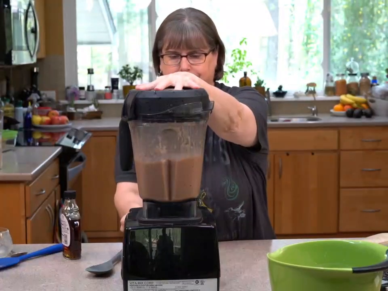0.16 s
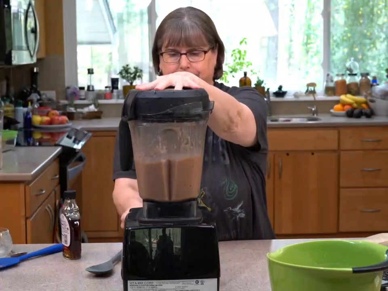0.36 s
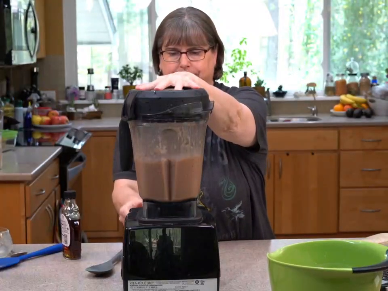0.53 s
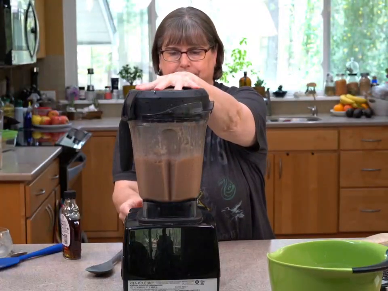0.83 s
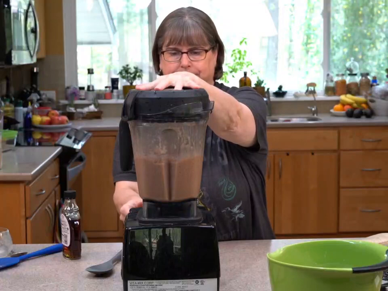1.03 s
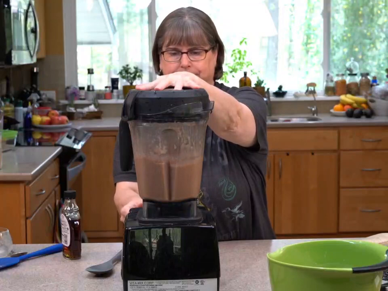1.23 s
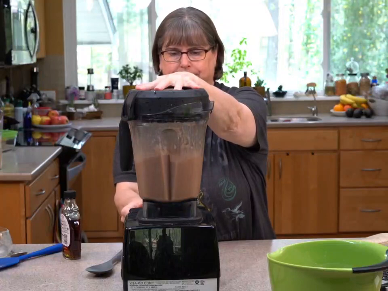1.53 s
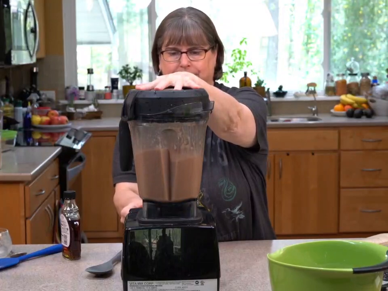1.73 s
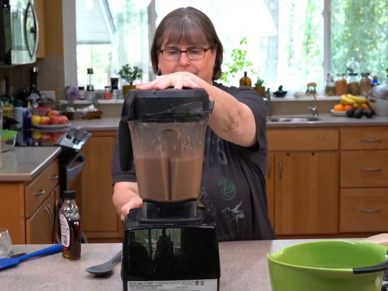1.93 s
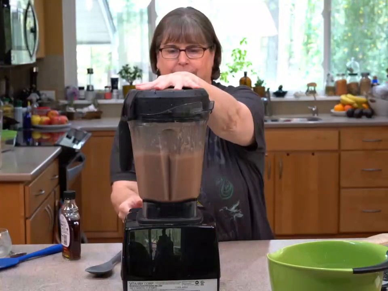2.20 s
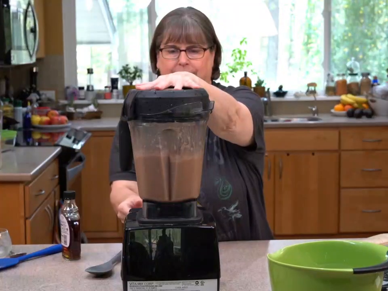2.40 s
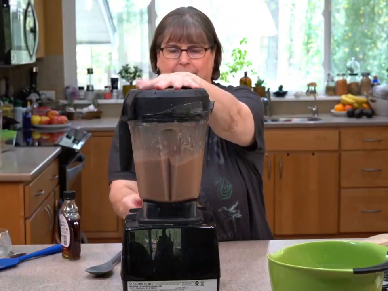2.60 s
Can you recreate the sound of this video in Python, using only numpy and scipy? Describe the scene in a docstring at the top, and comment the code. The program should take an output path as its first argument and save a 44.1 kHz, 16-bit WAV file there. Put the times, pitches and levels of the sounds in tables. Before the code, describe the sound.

A kitchen blender clicks on, buzzes low, then roars loudly, crunching ice in a thick drink

```python
"""A quiet kitchen, the microphone close to a blender: noise for the hush, a wavering sine for a faint far whistle.
A hand bumps the base and clicks the switch; the motor buzzes at low speed as harmonics of its magnetic pull.
Then the dial is turned up and the blades churn a thick drink: coloured noise, jug-wall rings and gritty cracks,
with lumps knocking the jug and ice cracking as short noise bursts sent through resonances."""
import sys
import numpy as np
from scipy import signal
from scipy.fft import rfft, irfft, next_fast_len
from scipy.io import wavfile
from scipy.ndimage import uniform_filter1d, map_coordinates

SR = 44100
rng = np.random.default_rng(int(sys.argv[2]) if len(sys.argv) > 2 else 0)


def file_out(sig):
    """Save sig as 16-bit WAV at sys.argv[1]."""
    # one column per channel
    cols = np.atleast_2d(sig).T
    # limit, then scale
    lim = np.clip(cols, -1, 1)
    pcm = np.round(lim * 32767).astype(np.int16)
    wavfile.write(sys.argv[1], SR, pcm)


def decibels_to_gain(level_db):
    """Convert a level in decibels to a linear amplitude gain (20 dB per decade)."""
    exponent = np.asarray(level_db, float) / 20
    return 10 ** exponent


N = 121275  # length in samples
ON_S, LOADED_S = 0.343, 1.21  # motor starts; buzz has given way to the loaded motor


def unit(x):
    """Scale to rms 1."""
    return x / np.sqrt(np.mean(x ** 2) + 1e-20)


def along(points, hz):
    """Read (hz, value) points on a log frequency axis."""
    f, v = np.transpose(points)
    return np.interp(np.log(hz + 1), np.log(f + 1), v)


def curves(rows):
    """One value per sample for each column after the time."""
    s, *cols = np.transpose(rows)
    return [np.interp(np.arange(N) / SR, s, c) for c in cols]


def wobble(rate):
    """A smooth random curve, rate knots a second."""
    knots = rng.standard_normal(int(N * rate / SR) + 4)
    return map_coordinates(knots, [np.arange(N) * rate / SR])


def filtered(x, response):
    """x times a complex response of frequency."""
    m = next_fast_len(N + SR // 2)
    return irfft(rfft(x, m) * response(np.fft.rfftfreq(m, 1 / SR)), m)[..., :N]


def peak(f, hz, wide_hz):
    """A causal resonance on the frequency grid, gain 1 at its centre."""
    return 1j * f * wide_hz / (hz * hz - f * f + 1j * f * wide_hz + 1e-9)


def rush(spectrum, patchy_db):
    """Coloured noise of rms 1 with time-frequency patches of random gain."""
    z = signal.stft(rng.standard_normal(N + 512), nperseg=256)[2]
    field = uniform_filter1d(rng.standard_normal(z.shape), size=4, axis=0)
    field = uniform_filter1d(field, size=4, axis=1)
    x = signal.istft(z * decibels_to_gain(patchy_db * unit(field)), nperseg=256)[1][:N]
    return unit(filtered(x, lambda hz: decibels_to_gain(along(spectrum, hz))))


def placed(s, wave):
    """Add each row of wave into the scene at its start."""
    at = np.round(s * SR).astype(int) + np.arange(wave.shape[1])
    return np.bincount(at.ravel(), wave.ravel(), N + SR)[:N]


def rings(s, db, hz, t60, attack_s):
    """Sum of damped sines, one per row, cut off after 50 ms."""
    t = np.arange(SR // 20) / SR
    s, db, hz, t60 = (np.reshape(v, (-1, 1)) for v in np.broadcast_arrays(s, db, hz, t60))
    envelope = decibels_to_gain(db - 60 * t / np.abs(t60)) * (1 - np.exp(-t / attack_s))
    return placed(s, envelope * np.sin(2 * np.pi * hz * t))


def snaps(s, db, t60, response):
    """Short noise bursts, each through its own response and scaled to its peak."""
    t = np.arange(2048) / SR
    burst = decibels_to_gain(-60 * t / np.abs(np.reshape(t60, (-1, 1)))) * rng.standard_normal((len(s), len(t)))
    wave = irfft(rfft(burst) * response(np.fft.rfftfreq(len(t), 1 / SR)), len(t))
    wave = wave * np.clip(2 - 2 * t / t[-1], 0, 1)  # fade the second half
    wave = wave * (decibels_to_gain(db) / np.abs(wave).max(axis=1))[:, None]
    return placed(s[:, None], wave)


def grains(count, hz, spread, turns, spiky_db):
    """Random short rings, rms 1, some louder than the rest; each loses 60 dB in a set number of turns."""
    u, g, e = rng.random(count), rng.standard_normal(count), rng.exponential(size=count)
    pitch = np.clip(hz * np.exp(spread * g), 100, SR / 3)
    return unit(rings(u * N / SR, spiky_db * np.minimum(e, 3), pitch, turns / pitch, attack_s=.0001))


def kitchen():
    """Room hush as patchy noise, and a faint whistle as a sine of wandering pitch and level."""
    # spectrum of the hush: pitch_hz, relative level_db per Hz
    air = [(15, -20), (45, 5.5), (152, -5), (349, -6), (737, -10), (2200, -18.5), (2730, -19),
           (11800, -25.5)]
    # faint far whistle: time_s, level_db
    whine = [(.09, -71), (.13, -85), (.17, -69), (.26, -69), (.3, -93)]
    db, = curves(whine)
    whistle_hz = 2800 + 110 * wobble(91)
    whistle = decibels_to_gain(db + 2.2 * wobble(48)) * np.sin(2 * np.pi * np.cumsum(whistle_hz) / SR)
    return decibels_to_gain(-58.5) * rush(air, patchy_db=2.0) + whistle


def room(x):
    """Reverberation: noise in which each frequency dies at its own speed, arriving 200 samples late."""
    # decay of the room: pitch_hz, t60_s
    decay = [(200, 0.13), (2000, 0.23), (7000, 0.12)]
    hz, t, z = signal.stft(rng.standard_normal(SR // 2), SR, nperseg=256)
    dying = decibels_to_gain(-60 * t / along(decay, hz)[:, None])
    tail = signal.istft(z * dying, SR, nperseg=256)[1]
    return signal.fftconvolve(np.pad(x, (200, 0)), tail / np.linalg.norm(tail))[:N]


def hand():
    """Plastic clicks of the controls as noise bursts, soft bumps on the base as damped sines."""
    # switch and dial: start_s, peak_db
    click_times = [(0.284, -39), (0.2905, -21), (0.408, -42), (0.4627, -24), (0.88, -37.5), (0.961, -46)]
    # colour of the clicks: pitch_hz, relative level_db
    click_colour = [(2000, -12), (3000, -2.5), (4500, -0.5), (6500, -4.5), (8200, 3), (11000, -15)]
    # hand on the base: start_s, level_db before attack and decay, pitch_hz
    bumps = [(.179, -44, 75), (.305, -36, 360), (.243, -43, 60), (0.316, -40, 830), (.317, -43, 141),
             (0.39, -29.5, 307), (0.456, -23, 340)]
    s, db = np.transpose(click_times)
    clicks = snaps(s, db, np.full(len(s), .013), lambda f: decibels_to_gain(along(click_colour, f)))
    s, db, hz = np.transpose(bumps)
    return clicks + rings(s, db, hz, 0.014 + 5.5 / hz, attack_s=0.00099)  # low bumps last longer


def jug(f):
    """Response of the jug wall: a sum of resonances of alternating sign."""
    # resonances of the wall: pitch_hz, width_hz, relative level_db
    modes = [(289, 30, -9.5), (347, 15, -3.5), (393, 14, -5.5), (574, 68, -9), (705, 105, -26),
             (970, 145, -2.5), (1366, 400, -4.5), (1676, 420, 0), (2130, 110, -1.5)]
    return sum((-1) ** k * decibels_to_gain(db) * peak(f, c, w) for k, (c, w, db) in enumerate(modes))


def knocks():
    """Short scuffs of noise into the jug wall, each lump stressing its own range; brighter ones scrape longer."""
    # heavy lumps hitting the jug: start_s, peak_db, centre_hz
    lump_hits = [(1.148, -22.5, 294), (1.22, -11, 500), (1.261, -17.5, 350), (1.346, -17.5, 300),
                 (1.466, -14.5, 340), (1.554, -13.5, 393), (1.897, -10, 385), (1.912, -9, 1730),
                 (2.008, -9, 1190), (2.078, -14, 870), (2.561, -17.5, 407), (2.601, -11.5, 393)]
    s, db, hz = np.transpose(lump_hits)
    t60 = 0.012 + 0.03 * hz / 1000
    centre = hz[:, None]
    return snaps(s, db, t60, lambda f: jug(f) * peak(f, centre, 1.1 * centre) ** 2)


def crack(s, db, hz, upper_db):
    """A dry snap through a broad blade resonance and a higher one, then a duller after-crunch."""
    def colour(f):
        blade = peak(f, hz[:, None], 1250) ** 2
        return blade - decibels_to_gain(upper_db)[:, None] * peak(f, 9000, 2400) ** 2
    crunch = snaps(s + 0.00062, db - 4, np.full(len(s), .014), lambda f: peak(f, 2330, 1750))
    return snaps(s, db, np.full(len(s), .001), colour) + crunch


def ice():
    """The loud cracks of ice on the blades, each a snap and its crunch."""
    # ice cracking: start_s, snap peak_db, ring_hz, upper ring relative to it_db
    crack_times = [(1.1546, -25, 4750, -5), (1.172, -17.5, 5330, -29), (1.2317, -2.5, 4500, -9),
                   (1.3035, 2, 5200, -32), (1.3217, -17, 5100, -21), (1.3676, -13.5, 4840, -18),
                   (1.388, -15, 4880, 10), (1.4097, -12.5, 5580, -14), (1.473, -17.5, 5600, -21),
                   (1.5202, -16, 5200, -30), (1.5599, -6, 4440, -9.5), (1.5882, -16.5, 4650, -4),
                   (1.6241, -11, 5500, -14), (1.6427, -19, 5100, -12), (1.66, -8.5, 4900, -1),
                   (1.7014, -9.5, 5250, -19), (1.7174, -9, 4600, -11), (1.7613, -14, 5030, -3),
                   (1.8184, -10, 5570, -13), (1.8908, -30, 5140, -19), (1.9074, -12.5, 5300, -19),
                   (1.9904, -10.5, 5550, 11), (2.0843, -9, 5040, -14), (2.2257, -6, 5030, -19),
                   (2.2508, -11, 5040, -17), (2.2766, -25, 5240, -9), (2.3004, -10.5, 4300, -28),
                   (2.3195, -9, 4700, -20), (2.3524, -4, 4900, 4), (2.415, -13.5, 4900, -19),
                   (2.4298, -15.5, 4760, -19), (2.4483, -15, 4840, -36), (2.4785, -6.5, 5100, -5),
                   (2.4862, -7.5, 5230, -25), (2.5302, -15, 5000, -4), (2.6134, -13, 5050, -19),
                   (2.7033, -9.5, 5260, -8)]
    return crack(*np.transpose(crack_times))


def grit(count):
    """Many small cracks at random moments, rms 1."""
    u, g, e = rng.random(count), rng.standard_normal((count, 2)), rng.exponential(size=count)
    hz = 5000 * np.exp(0.061 * g[:, 0])
    return unit(crack(u * N / SR, 5 * np.minimum(e, 3), hz, -9 + 5 * g[:, 1]))


def spin_up():
    """Gain of the turning parts: a 19 ms ramp once the motor starts."""
    return np.clip((np.arange(N) / SR - ON_S) / 0.019, 0, 1)


def buzz():
    """Harmonics of the magnetic pull that give way under load, over a steadily ringing housing."""
    # harmonics of the pull: multiple, relative level_db
    harmonics = [(1, -3), (2, 3), (3, -5.5), (4, -7.5), (5, -2.5), (6, -3.5)]
    pull_hz = 119.9  # twice the mains
    t = np.arange(N) / SR
    tones = 0
    for k, db in harmonics:
        level = decibels_to_gain(db + 0.7 * k * wobble(29.87))  # higher harmonics waver more
        tones = tones + level * np.sin(2 * np.pi * k * pull_hz * t + 0.89 * wobble(12.1))
    tones = decibels_to_gain(-48) * tones * np.clip((LOADED_S - t) / 0.072, 0, 1)
    housing = decibels_to_gain(-49.5) * unit(filtered(rng.standard_normal(N), lambda f: peak(f, 703, 130) ** 2))
    return (tones + housing) * np.clip((t - ON_S + 0.0093) / 0.093, 0, 1)


def base():
    """The base shaking the counter: low noise, joined under load by an unsteady low tone."""
    # colour of the rumble: pitch_hz, relative level_db per Hz
    rumble_colour = [(20, -32), (81, -22), (107, -4.5), (140, -8.5), (250, -11), (320, 1), (550, -120)]
    # rumble strength: time_s, level_db
    strength = [(.35, -57), (1.1, -52.5), (1.3, -43.5), (1.7, -38.5), (2.2, -45), (2.75, -42)]
    low_db, = curves(strength)
    t = np.arange(N) / SR
    rumble = decibels_to_gain(low_db + 1.2 * wobble(9.1)) * rush(rumble_colour, patchy_db=1.0)
    shake = decibels_to_gain(low_db - 2 + 1.6 * wobble(19)) * np.sin(2 * np.pi * 114.7 * t + wobble(9.9))
    return spin_up() * rumble + shake * np.clip((t - LOADED_S) / 0.041, 0, 1)


def blades():
    """Drink churning in the jug with random knocks, and fizzing grit with more cracks as the treble rises."""
    # loudness of the churn and of the treble fizz, before the mix gains below: time_s, churn_db, treble_db
    loudness = [(.33, -53, -56), (.39, -56.5, -65), (.47, -44.5, -61), (.56, -38.5, -54.5),
                (.68, -44.5, -56), (.85, -43, -55), (1.05, -44, -55), (1.12, -39.5, -54), (1.17, -31, -47),
                (1.21, -27, -39.5), (1.25, -24, -34.5), (1.36, -23, -34.5), (1.5, -23.5, -39),
                (1.62, -23.5, -37.5), (1.76, -21, -32.5), (1.86, -21.5, -35), (1.92, -22, -27.5),
                (1.96, -21.5, -34), (2.02, -21, -27), (2.12, -20, -33.5), (2.2, -23.5, -36),
                (2.3, -24, -29.5), (2.44, -26, -41), (2.55, -23.5, -35), (2.66, -23, -32.5),
                (2.75, -22.5, -33)]
    # churn heard through the jug: pitch_hz, relative level_db per Hz
    body = [(59, -17), (100, -16.5), (156, -10.5), (366, -1.5), (483, -4), (1090, -5), (1260, -5.5),
            (4000, -19.5), (5200, -51), (8800, -120)]
    # grit on the blades: pitch_hz, relative level_db per Hz
    fizz_colour = [(1470, -11), (2500, 0), (4430, -5.5), (5080, -5.5), (6810, -11.5), (10900, -24),
                   (11800, -21)]
    churn_db, treble_db = curves(loudness)
    lumps = unit(filtered(grains(count=900, hz=1174, spread=0.62, turns=5.4, spiky_db=3), jug))
    # one flutter moves churn and fizz together, deeper as the churn gets louder
    flutter_db = 1.1 * wobble(60) * np.clip((churn_db + 52) / 20, 0, 1)
    churn = decibels_to_gain(-2.0) * rush(body, patchy_db=0.5) + decibels_to_gain(-9.5) * lumps
    fast = np.clip((treble_db + 53) / 18, 0, 1)
    fizz = decibels_to_gain(2.0) * rush(fizz_colour, patchy_db=1.3) + fast * decibels_to_gain(-6.5) * grit(count=600)
    return spin_up() * (decibels_to_gain(churn_db + flutter_db) * churn + decibels_to_gain(treble_db + flutter_db) * fizz)


def motor():
    """The running blender: buzz, shaking base and churning blades."""
    return buzz() + base() + blades()


def scene():
    """All sources, the sharp ones with the room."""
    hush = kitchen()
    thuds = hand() + knocks()
    cracks = ice()
    echo = room(decibels_to_gain(-9) * cracks + decibels_to_gain(-5.0) * thuds)
    return (hush + thuds + cracks + echo + motor())[None]


def top_cut(x):
    """Nothing passes above the cut-off."""
    return signal.sosfilt(signal.butter(12, 12000, fs=SR, output="sos"), x)


def record(dry):
    """The microphone's signal: treble fades out from 11.2 to 12.1 kHz, loud peaks clip softly."""
    dull = filtered(dry, lambda hz: np.clip((12100 - hz) / 900, 0, 1))
    mix = dull / (1 + np.abs(dull) ** 8) ** (1 / 8)
    return top_cut(mix)


dry = scene()
out = record(dry)
file_out(out)
```